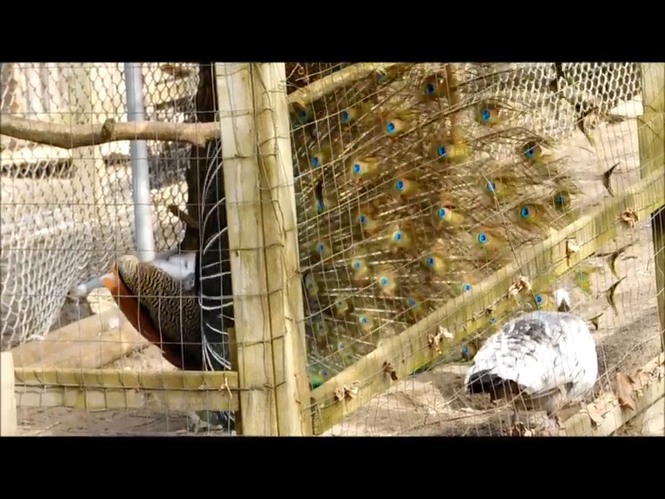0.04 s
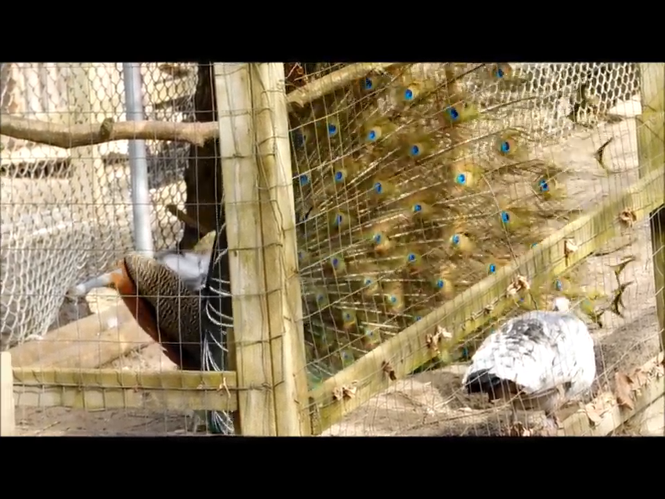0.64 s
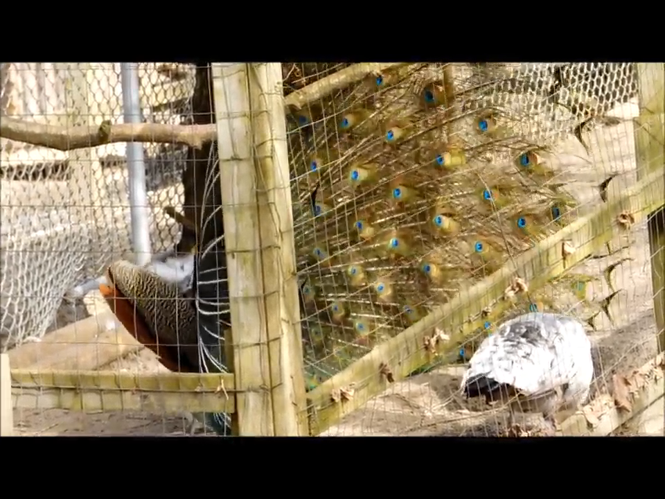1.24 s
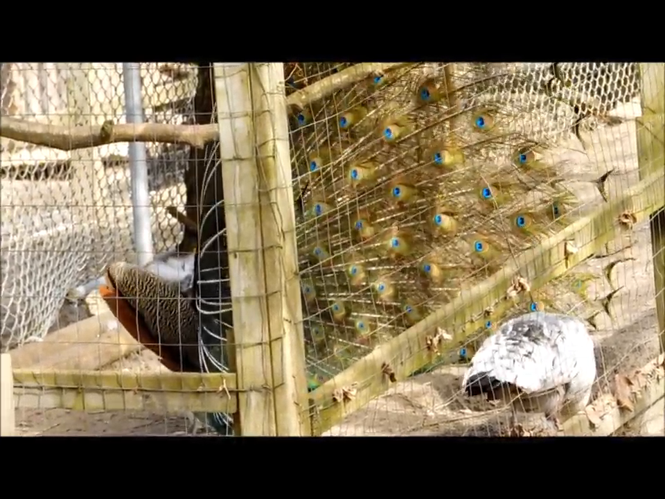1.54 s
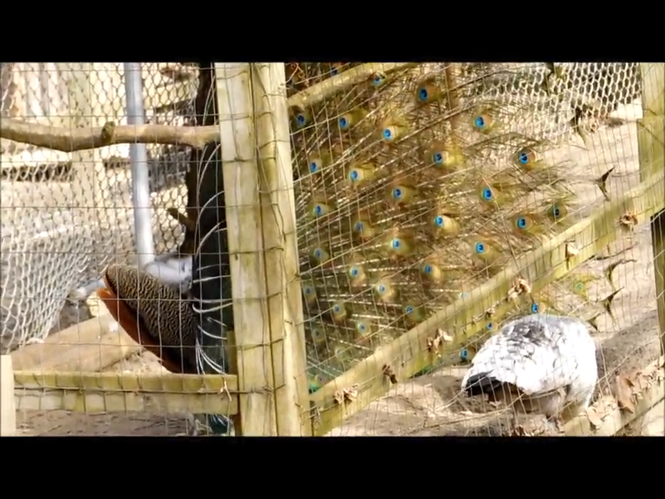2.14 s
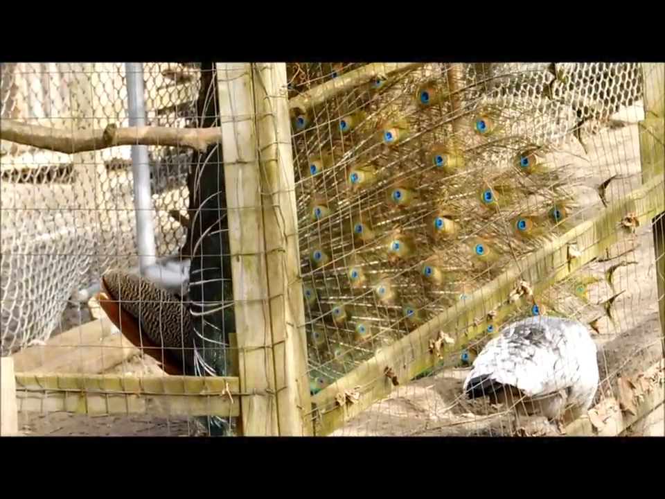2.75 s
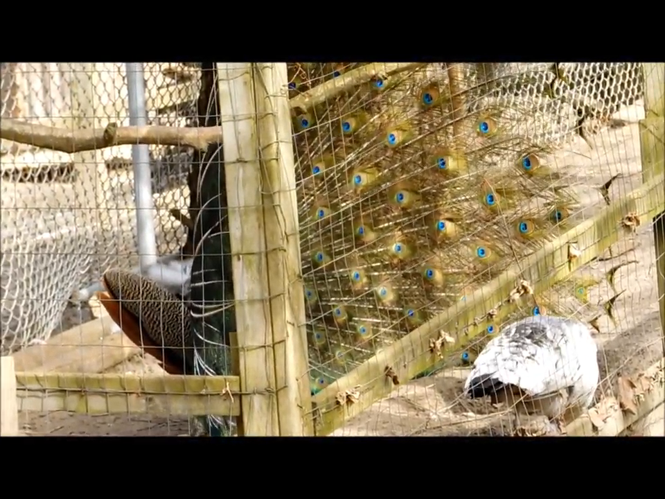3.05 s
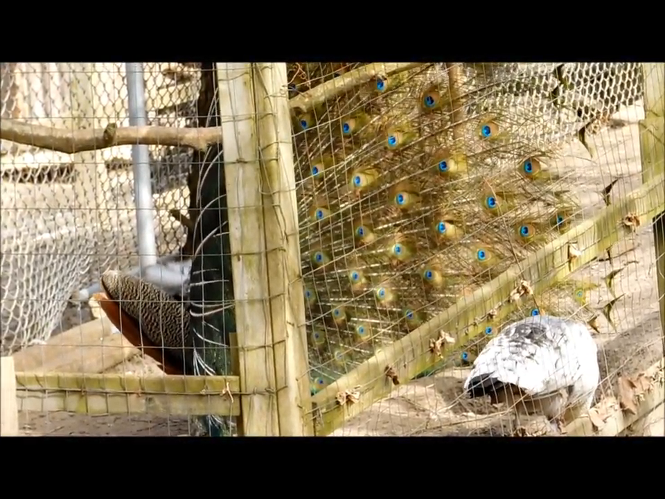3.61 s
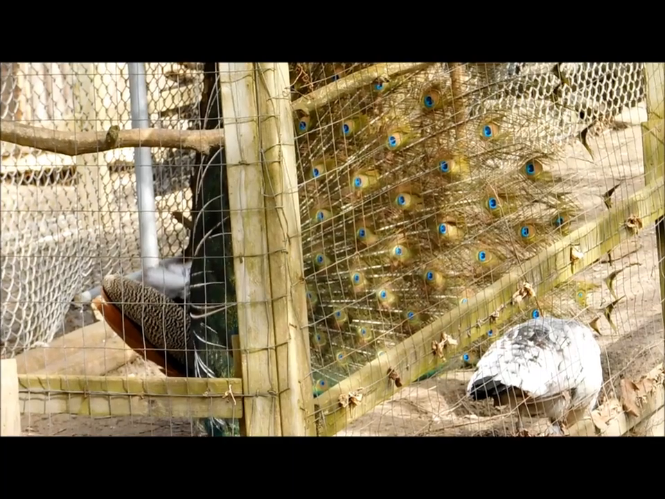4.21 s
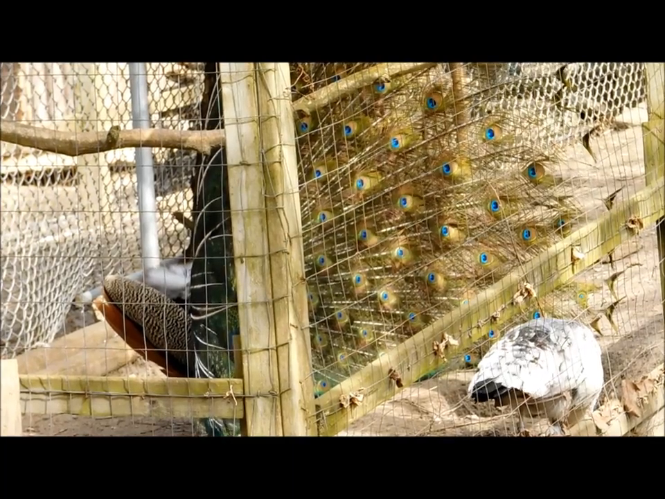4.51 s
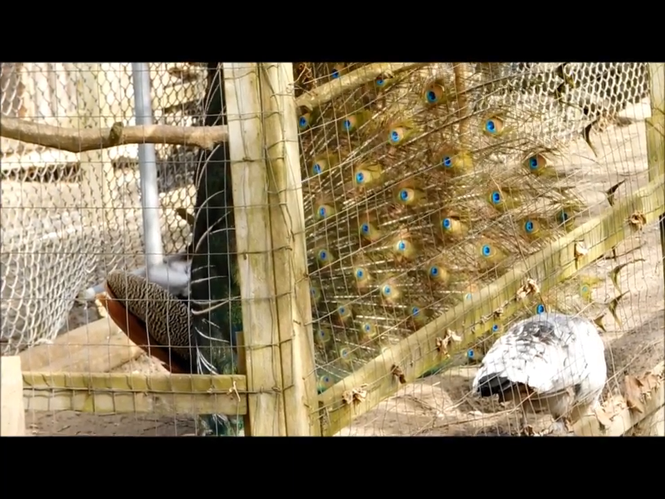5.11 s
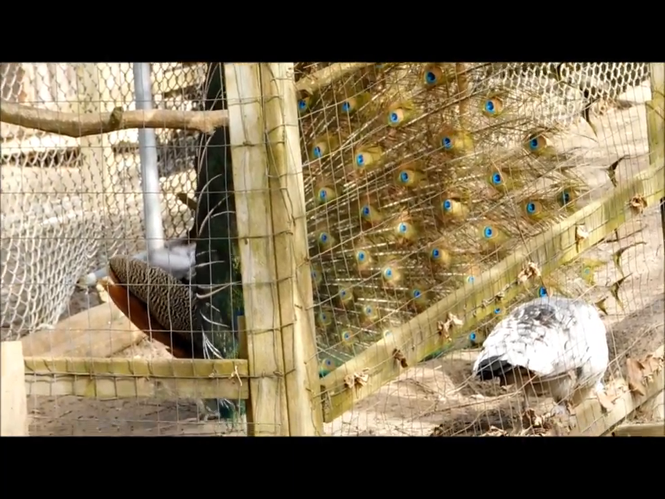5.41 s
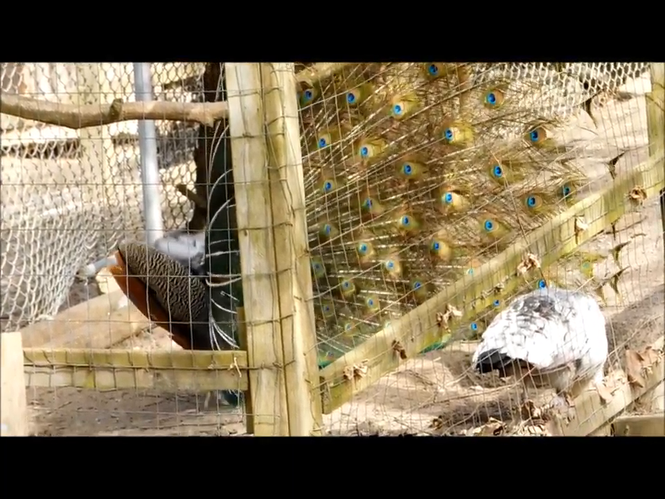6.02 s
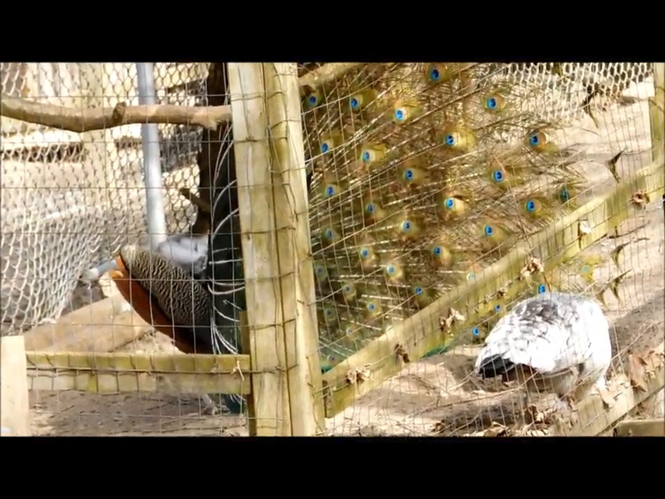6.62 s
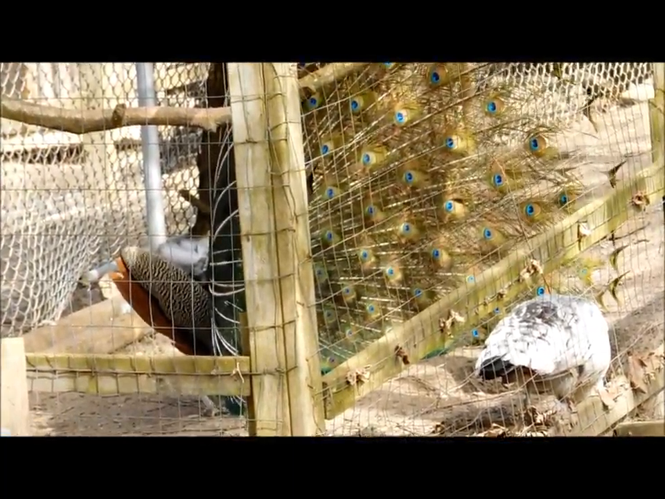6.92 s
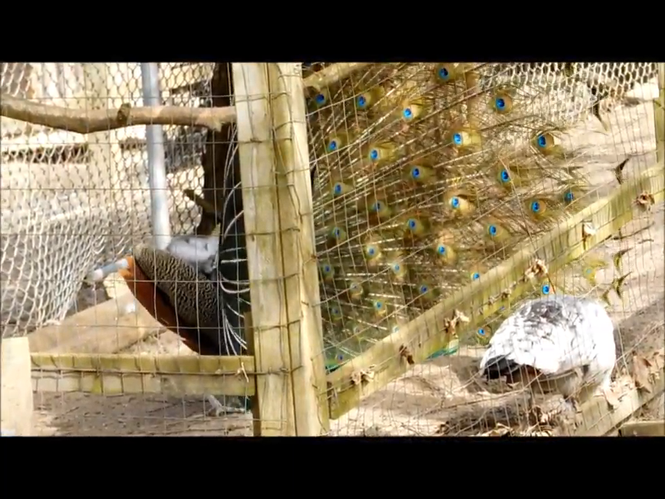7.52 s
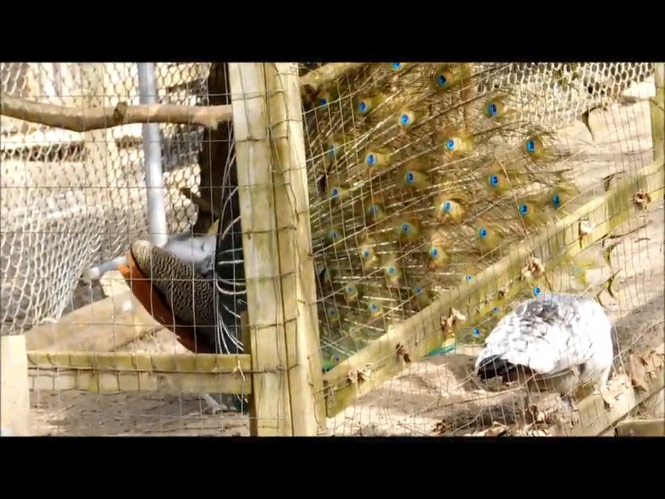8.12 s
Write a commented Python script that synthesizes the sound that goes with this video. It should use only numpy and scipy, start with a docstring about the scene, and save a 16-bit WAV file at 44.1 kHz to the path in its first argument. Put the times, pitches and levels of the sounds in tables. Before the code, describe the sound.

Outdoors by a bird pen, a diesel engine idles some way off with a low drone, clatter and a regular metal clank. After about two seconds it is switched off and shudders to rest with rattling panels. In the quiet a sparrow chips, and a songbird to the left repeats a short rising whistle. Something hard snaps once close to the microphone. Faint distant traffic and hiss lie underneath.

```python
"""A three-cylinder diesel idles some way off, is switched off and shudders to rest by a peacock pen.
Exhaust puffs drone, block and injectors clatter, a loose part clanks; last compressions jolt the panels.
In the quiet a songbird repeats a rising whistle, a sparrow chips, and something hard snaps close by.
Distant traffic and a faint hiss lie under it all."""
import sys
import numpy as np
from scipy import signal
from scipy.fft import rfft, irfft, next_fast_len
from scipy.io import wavfile

SR = 44100
rng = np.random.default_rng(int(sys.argv[2]) if len(sys.argv) > 2 else 0)


def wav_out(sig):
    """Save sig, one row per channel (or a flat mono array), as 16-bit PCM at SR to the path in sys.argv[1]."""
    wavfile.write(sys.argv[1], SR, np.round(np.clip(np.atleast_2d(sig).T, -1, 1) * 32767).astype(np.int16))


N = 368235
T = np.arange(N) / SR
FUEL_CUT_S = 2.08
ENGINE_LEAD_S = 0.00011   # left ear first

# interaural correlation, ambient and engine: (frequency [Hz], correlation [-1..1])
AIR_LIKENESS = [(100, 0.37), (250, -0.15), (400, -0.099), (600, 0.18), (1200, -0.11), (2000, -0.084),
                (3000, -0.078), (4200, 0.00018), (5500, 0.16), (15000, 0.53)]
ENGINE_LIKENESS = [(100, 0.99), (400, 0.92), (1000, 0.86), (3000, 0.36), (5000, 0.098), (15000, 1)]
# metal contacts per working cycle: (place [cycles], knock [dB], tick [dB])
CONTACTS = [(.07, -2.5, 9), (.219, -2, -12), (.33, -10.5, 8), (.395, 0, -12), (.66, -5, 5), (.709, -6, 4),
            (0.787, -4.5, -10), (.915, -7.5, 6), (.955, -4, -12)]


def from_db(db):
    """Decibels to gain."""
    return 10 ** (np.asarray(db) / 20)


def rms_one(x):
    """Scale to rms 1."""
    return x / np.sqrt(np.mean(x ** 2) + 1e-20)


def bell(x, centre, width):
    """Gaussian of height 1."""
    return np.exp(-((x - centre) / width) ** 2)


def add(track, s, sound):
    """Mix a short sound in at time s."""
    i = int(s * SR)
    track[i:i + len(sound)] += sound[:N - i]


def at_hz(points, hz):
    """Interpolate on a log-frequency axis."""
    f, value = np.transpose(points)
    return np.interp(np.log(hz), np.log(f), value)


def filtered(x, response):
    """Apply response(hz) by FFT."""
    size = next_fast_len(N + 4096, real=True)
    hz = np.maximum(np.arange(size // 2 + 1) * SR / size, 1)
    return irfft(rfft(x, size) * response(hz), size)[..., :N]


def coloured(x, colour):
    """Apply a spectrum; roll off below 18 Hz."""
    return filtered(x, lambda hz: from_db(at_hz(colour, hz)) / (1 + (18 / hz) ** 4))


def drift(rate_hz):
    """Low-passed noise, rms 1."""
    return rms_one(filtered(rng.standard_normal(N), lambda hz: 1 / (1 + (hz / rate_hz) ** 4)))


def placed(left, right, lead_s, pan_db):
    """Delay the right ear; positive pan is left."""
    right = filtered(right, lambda hz: np.exp(-2j * np.pi * hz * lead_s))
    return np.array([left * from_db(pan_db / 2), right * from_db(-pan_db / 2)])


def ears(mid, side, likeness, lead_s=0, pan_db=0):
    """Stereo of given correlation from two independent signals."""
    alike = lambda hz: np.clip(at_hz(likeness, hz), -1, 1)
    mid = filtered(mid, lambda hz: np.sqrt((1 + alike(hz)) / 2))
    side = filtered(side, lambda hz: np.sqrt((1 - alike(hz)) / 2))
    return placed(mid + side, mid - side, lead_s, pan_db)


def stereo_noise(colour, likeness, lead_s=0, pan_db=0):
    """Coloured stereo noise, rms 1."""
    return rms_one(ears(*coloured(rng.standard_normal((2, N)), colour), likeness, lead_s, pan_db))


def scatter(t60_s):
    """Decaying reflections, unit energy."""
    t = T[:SR // 2]
    spray = rng.standard_normal(len(t)) * from_db(-60 * t / t60_s)
    return spray / np.sqrt(np.sum(spray ** 2))


def through(x, response):
    """Convolve with an impulse response."""
    return signal.fftconvolve(x, response)[:N]


def background(traffic_db=-53, hiss_db=-58, split_hz=4500):
    """Far traffic below the split, grainy hiss above; each dips once."""
    # ambient spectrum: (frequency [Hz], density [dB])
    air_colour = [(13, -31), (22, 0), (70, -2.5), (108, -4.5), (142, -5), (177, -9), (290, -8), (475, -8.5),
                  (516, -7.5), (1390, -9), (1820, -10), (2400, -11), (4040, -14), (4630, -14.5),
                  (15500, -11.5)]
    air = stereo_noise(air_colour, AIR_LIKENESS)
    low = filtered(air, lambda hz: 1 / (1 + (hz / split_hz) ** 4))
    band_rms = lambda lo, hi: np.std(filtered(air.mean(0), lambda hz: (hz > lo) & (hz < hi)))
    traffic, hiss = low / band_rms(200, 1500), (air - low) / band_rms(7000, 15000)
    sway_db = .4 * drift(3.4) - 1.3 * bell(T, 4.02, .13)
    flicker_db = 1.6 * drift(90) + .6 * drift(12) - 3.5 * bell(T, 2.27, .16)
    return traffic * from_db(traffic_db + sway_db) + hiss * from_db(hiss_db + flicker_db)


def bumps():
    """Soft bass bumps, nearly alike in both ears."""
    # swells: (time [s], half width [s], level [dB])
    swells = [(7.57, 0.022, -53), (7.64, 0.025, -48), (7.855, 0.026, -45.5), (8.26, 0.085, -56)]
    # spectrum: (frequency [Hz], level [dB])
    colour = [(30, -6), (70, 1), (150, -16), (300, -15), (1500, -13), (5000, -31)]
    envelope = sum(from_db(db) * bell(T, s, width_s) for s, width_s, db in swells)
    return envelope * stereo_noise(colour, ENGINE_LIKENESS)


def rustle(at_s=4.2, width_s=0.053, level_db=-56):
    """Faint, brief rustle in the pen."""
    # spectrum: (frequency [Hz], level [dB])
    colour = [(2000, -28), (3500, -7), (4500, -2), (6500, -8)]
    return from_db(level_db) * bell(T, at_s, width_s) * stereo_noise(colour, AIR_LIKENESS)


def swoop(at_s=1.215, tone_hz=242, sag_hz_per_s=750, thud_s=1.32, thud_hz=72):
    """A faint low tone slides down, then a soft thud."""
    age = T - at_s
    tone = bell(T, at_s, .044) * np.sin(2 * np.pi * (tone_hz - sag_hz_per_s * age / 2) * age)
    thud = bell(T, thud_s, .011) * np.sin(2 * np.pi * thud_hz * (T - thud_s))
    return from_db(-43) * tone + from_db(-39) * thud


def chips(top_share=.33):
    """Sparrow: short, raspy pitch arches."""
    # chips: (time [s], length [s], start [Hz], top [Hz], end [Hz], level [dB], rasp [share of pitch])
    calls = [(3.08, 0.059, 3520, 3650, 3400, -52, .04), (3.281, .03, 3400, 3590, 3450, -52, .02),
             (3.33, 0.051, 2780, 3340, 3300, -47, 0.03), (3.353, 0.036, 3160, 3020, 2720, -38.5, 0.017),
             (3.731, 0.033, 3550, 3630, 3250, -48, .03), (3.773, .07, 3330, 3680, 3400, -47, .09),
             (3.823, 0.044, 2640, 2770, 2680, -47, .045)]
    out, wobble = np.zeros(N), drift(303)
    for s, length_s, start_hz, top_hz, end_hz, db, rasp in calls:
        span = (T > s) & (T < s + length_s)
        progress = (T[span] - s) / length_s
        arch = np.sqrt(np.abs(np.sin(np.pi * progress)))
        hz = np.interp(progress, [0, top_share, 1], [start_hz, top_hz, end_hz])
        hz *= 1 + rasp * wobble[span]
        out[span] += from_db(db) * arch * np.sin(2 * np.pi * np.cumsum(hz) / SR)
    return out


def whistles(level_db=-3, overtone_db=-25, attack_s=.0023, release_s=.0017, waver=.009, fray=.022):
    """Songbird: a repeated upward slur that swells midway, frays and ends in a steep flick."""
    # whistles: (time [s], length [s], level [dB], start-to-end gain [dB], flick accent [dB])
    calls = [(3.659, .17, -43.5, 9, -3), (4.098, 0.17, -46, 7, 1), (4.476, 0.17, -39.5, -2, 1),
             (4.857, 0.18, -42.5, 0, -2), (5.201, 0.16, -39, -2, 1), (5.52, 0.16, -39, -5, 6),
             (5.827, 0.17, -37.5, 2, 2), (6.142, 0.15, -37, 3, 2), (6.443, 0.17, -40, 1, 1),
             (6.75, .164, -38.7, 3, -3), (7.05, .16, -39.3, 1, 0), (7.354, 0.17, -39.5, 1, -1),
             (7.665, .16, -38.5, 1, 1), (7.973, 0.18, -40, 1, -6)]
    # common contour: (progress [0..1], pitch [Hz], level [dB])
    slur = [(0, 1860, -8), (.12, 2000, -2.5), (.24, 2150, -2), (.4, 2350, 1.5), (.54, 2510, 1.5),
            (.64, 2660, -3), (.75, 2850, -2), (.87, 3170, -2.5), (.9, 3450, -8), (.94, 3780, -6),
            (1, 3900, -9)]
    share, slur_hz, slur_db = np.transpose(slur)
    out, wobble, flutter_db = np.zeros(N), drift(340), 2.8 * drift(80)
    for s, length_s, db, swell_db, flick_db in calls:
        span = (T > s) & (T < s + length_s)
        age = T[span] - s
        progress = age / length_s
        gate = np.clip(np.minimum(age / attack_s, (length_s - age) / release_s), 0, 1)
        hz = np.interp(progress, share, slur_hz) * (1 + (waver + fray * progress ** 2) * wobble[span])
        phase = 2 * np.pi * np.cumsum(hz) / SR
        tone = np.sin(phase) + from_db(overtone_db) * np.sin(2 * phase)
        effort_db = np.interp(progress, share, slur_db) + swell_db * (progress - .5)
        effort_db += flick_db * bell(progress, .96, .08) + flutter_db[span]
        out[span] += gate * from_db(level_db + db + effort_db) * tone
    return out


def birds(ground_s=.003, ground_db=-10, tail_db=-6.5, tail_t60_s=0.36):
    """Both birds from the left, with a ground echo and a tail off far sheds."""
    song = whistles() + chips()
    heard = song + from_db(ground_db) * np.interp(T - ground_s, T, song)
    yard = np.array([through(song, from_db(tail_db) * scatter(tail_t60_s)) for _ in range(2)])
    return placed(heard, heard, lead_s=.00019, pan_db=4.5) + yard


def snap(right_db=3.5, crack_db=-12, crack_t60_s=.012, wet_db=-13, yard_t60_s=.086, low_cut_hz=550):
    """Dry snap near the right ear: a click rings the short modes of a small, light object."""
    # tick, snap, echo: (time [s], level [dB], right-ear lead [s])
    hits = [(5.2496, -25, 0.00015), (5.2762, -9.5, 0.00014), (5.284, -23, 0.00016)]
    # object modes: (frequency [Hz], level [dB], t60 [s])
    modes = [(785, -25, 0.013), (1050, -19, 0.024), (1410, -13, 0.014), (1910, -10.5, 0.024),
             (2410, -3, 0.012), (3040, -4, 0.0077), (3600, -12, 0.0099), (4400, -10.5, 0.0077),
             (5420, -13.5, .005), (6500, -12.5, 0.0041), (7800, -12, 0.0041), (10900, -7, 0.0034),
             (15000, -21, .003)]
    out, t = np.zeros((2, N)), T[:SR // 20]
    for ear in range(2):
        ring = sum((-1) ** k * from_db(db + rng.normal(0, 1) - 60 * t / t60_s)
                   * np.sin(2 * np.pi * hz * t) for k, (hz, db, t60_s) in enumerate(modes))
        ring += from_db(crack_db - 60 * t / crack_t60_s) * rng.standard_normal(len(t))
        for s, db, lead_s in hits:
            add(out[ear], s + lead_s * (1 - ear), from_db(db + right_db * ear) * ring)
        out[ear] += from_db(wet_db) * through(out[ear], scatter(yard_t60_s))
    return signal.sosfilt(signal.butter(2, low_cut_hz, "high", fs=SR, output="sos"), out + 1e-18)


def hard_knocks(t60_s=0.0094):
    """A few dry, hollow knocks from the machine stand out above its clatter."""
    # knocks: (time [s], peak [dB], pitch [Hz])
    knocks = [(1.2045, -23.5, 950), (1.3165, -26, 1300)]
    out, t = np.zeros(N), T[:SR // 20]
    for s, db, hz in knocks:
        add(out, s, -from_db(db - 60 * t / t60_s) * np.sin(2 * np.pi * hz * t))
    return placed(out, out, ENGINE_LEAD_S, pan_db=1.5)


def jolts(rise_s=.0083, t60_s=.27, panel_rise_s=.01, panel_t60_s=.14, thump_hz=65, thump_t60_s=.064):
    """The last compressions rock the machine on its mounts; each rings one panel most."""
    # jolts: (time [s], rattle [dB], thump [dB], panel [Hz], panel [dB])
    shudders = [(2.268, -44.5, -38, 138, -35), (2.336, -60, -48, 170, -41.5), (2.389, -45, -33, 284, -46),
                (2.463, -42.5, -53, 1106, -45), (2.502, -48, -34, 327, -39), (2.525, -55, -58, 890, -45),
                (2.605, -44, -54, 1024, -40), (2.66, -45, -42, 754, -48), (2.756, -49, -49, 330, -44),
                (2.814, -44.5, -49, 1010, -56), (2.936, -39.5, -55, 1026, -38),
                (3.092, -46.5, -61, 727, -41)]
    # rattle spectrum: (frequency [Hz], level [dB])
    colour = [(100, -6), (240, -1.5), (325, 1), (410, -4), (560, -1), (650, -2), (750, 4.5), (840, 2),
              (1020, 0.5), (1400, -1), (2500, -26), (8000, -39)]
    rattle, thump, ring = np.zeros((3, N))
    for s, rattle_db, thump_db, panel_hz, panel_db in shudders:
        age = np.maximum(T - s, 0)
        rattle += from_db(rattle_db - 60 * age / t60_s) * np.minimum(age / rise_s, 1)
        panel_gain = from_db(panel_db - 60 * age / panel_t60_s) * np.minimum(age / panel_rise_s, 1)
        ring += panel_gain * np.sin(2 * np.pi * panel_hz * age)
        thump -= from_db(thump_db - 60 * age / thump_t60_s) * np.sin(2 * np.pi * thump_hz * age)
    return rattle * stereo_noise(colour, ENGINE_LIKENESS, ENGINE_LEAD_S) + thump + ring


def clanks(cycles, place=.64, level_db=-29.5, crack_t60_s=.011, wet_db=-5, yard_t60_s=.23):
    """A loose part strikes and bounces once per cycle until the fuel is cut."""
    # hardest clanks: (time [s], boost [dB])
    accents = [(.046, 5), (.108, 3), (.17, 4), (.232, 3), (.354, 5), (.481, 5), (.543, 7), (.605, 7.5),
               (.792, 5), (.916, 4), (1.04, 2.5), (1.226, 5), (1.288, 5.5), (1.35, 7), (1.474, 3),
               (1.537, 5), (1.723, 7), (1.785, 8.5), (1.971, 6), (2.033, 7)]
    # triple bounce: (delay [s], level [dB])
    bounces = [(0, -9), (.0035, -1.5), (.0078, -.5)]
    # modes of the part: (frequency [Hz], level [dB], t60 [s])
    modes = [(1480, -3.5, 0.007), (1860, 6, 0.017), (1950, 5.5, 0.01), (2110, -5, 0.036),
             (2260, -8.5, 0.021), (3060, 0.5, 0.0045), (3260, -22, 0.0037)]
    out, t = np.zeros(N), T[:SR // 20]
    crack_band = signal.butter(2, [1300, 3300], "band", fs=SR)
    strike_cycles = np.arange(place, np.interp(FUEL_CUT_S, T, cycles))
    for s in np.interp(strike_cycles, cycles, T):
        accent_db = sum(db for at_s, db in accents if abs(at_s - s) < .03)
        blow_db = level_db + accent_db + rng.normal(0, .6)
        for delay_s, bounce_db in bounces:
            ring = sum(from_db(db + rng.normal(0, .5) - 60 * t / t60_s) * np.sin(2 * np.pi * hz * t)
                       * rng.choice([-1, 1]) for hz, db, t60_s in modes)
            crack = 2 * signal.lfilter(*crack_band, rng.standard_normal(len(t)))
            ring += from_db(5 - 60 * t / crack_t60_s) * crack
            add(out, s + delay_s, from_db(blow_db + bounce_db) * ring / np.abs(ring).max())
    yard = np.array([through(out, from_db(wet_db) * scatter(yard_t60_s)) for _ in range(2)])
    return placed(out, out, ENGINE_LEAD_S, pan_db=3) + yard


def clatter(cycles, levels_db, colour, ring_t60_s, loose, uneven_db):
    """Contacts ring the same metal each cycle; `loose` adds fresh noise per blow. Rms 1 at idle."""
    blows = np.zeros(N)
    for (place, *_), db in zip(CONTACTS, levels_db):
        at = np.searchsorted(cycles, np.arange(48) + place)
        size = from_db(db + uneven_db * rng.standard_normal(len(at)))
        blows[at[at < N]] += size[at < N]
    ring, yard = (from_db(-60 * T[:SR // 4] / t60_s) for t60_s in (ring_t60_s, .15))
    power = through(blows ** 2, ring ** 2 / np.sum(ring ** 2) + yard ** 2 / np.sum(yard ** 2))
    noise_gain = loose * np.sqrt(np.abs(power))
    paths = [through(blows, scatter(ring_t60_s) + scatter(.25)) + noise_gain * rng.standard_normal(N)
             for _ in range(2)]
    sound = ears(*coloured(np.array(paths), colour), ENGINE_LIKENESS, ENGINE_LEAD_S, pan_db=2)
    return sound / np.std(sound[:, :2 * SR])


def exhaust(speed, cycles, unfired, idle_db=-37.5, puff_place=.3):
    """Exhaust puffs drone and panels buzz along; without fuel the puffs turn weak and ragged."""
    # harmonics of puffs and panels: (order [per cycle], level [dB])
    puff_orders = [(3, -1.5), (6, 1.5), (9, 3.5), (12, -9.5), (15, -15), (18, -14.5), (19, -15), (21, -9),
                   (22, -14.5), (23, -20), (25, -19), (27, -31)]
    panel_orders = [(47, -20.5), (48, -7.5), (59, -8.5), (61, -8.5), (64, -13), (66, -16.5), (75, -9.5)]
    lag = lambda k: np.pi / 2 / (1 + (k / 3) ** 4)   # the deepest note leaves the muffler late
    drone = sum(-from_db(db) * np.cos(2 * np.pi * k * (cycles - puff_place) - lag(k))
                for k, db in puff_orders)
    drone += sum(from_db(db) * (1 + .14 * drift(8.6)) * np.sin(2 * np.pi * (k * cycles + rng.random()))
                 for k, db in panel_orders)
    drone /= np.std(drone[:2 * SR])
    drone *= from_db(idle_db - 9 * unfired - 14.5 * (1 - speed))
    drone *= 1 + .7 * unfired * drift(35)
    return placed(drone, drone, ENGINE_LEAD_S, pan_db=1)


def block(speed, cycles, unfired, knock_db=-36.5, tick_db=-45):
    """The block knocks and the injectors tick, softer without fuel and as speed falls."""
    # spectra: (frequency [Hz], level [dB])
    knock_colour = [(35, -16), (70, -16), (150, -3.5), (260, -1), (350, 1.5), (480, -4), (750, 1.5),
                    (880, 1), (1030, 3.5), (1250, 0.5), (1500, 0.5), (2200, -5.5), (3200, -10.5),
                    (5500, -25), (12000, -28)]
    tick_colour = [(500, 6), (1300, -7), (1900, 7.5), (2400, -7), (3000, 8), (3900, -17), (5000, -3),
                   (12000, -30)]
    _, knocks_db, ticks_db = np.transpose(CONTACTS)
    knock = clatter(cycles, knocks_db, knock_colour, ring_t60_s=.031, loose=.88, uneven_db=1.25)
    tick = clatter(cycles, ticks_db, tick_colour, ring_t60_s=.032, loose=2.1, uneven_db=4)
    drop_db = 8.5 * unfired + 2.5 * (1 - speed)
    return knock * from_db(knock_db - drop_db) + tick * from_db(tick_db - drop_db - 3 * unfired)


def fan(speed, unfired, idle_db=-44):
    """Even rush of fan and gears, fading with speed."""
    # spectrum: (frequency [Hz], density [dB])
    colour = [(500, -21), (1400, -3.5), (1800, -1.5), (2300, 1.5), (2650, -4.5), (3100, -8), (4000, -10),
              (5200, -12.5), (7000, -15.5), (12000, -27)]
    rush = stereo_noise(colour, ENGINE_LIKENESS, ENGINE_LEAD_S, pan_db=2)
    return rush * speed * from_db(idle_db - 8 * unfired + 1.2 * drift(4))


def crankshaft(coast_s=1.15, coast_bend=1.3):
    """Speed [share of idle] and cycles done, three firings each; coasting slows fastest at first."""
    # idle speed: (time [s], firing rate [Hz])
    idle = [(0, 48.2), (1.0, 48.4), (2.03, 47.9)]
    idle_hz = np.interp(T, *np.transpose(idle))
    speed = np.clip(1 - (T - FUEL_CUT_S) / coast_s, 0, 1) ** coast_bend
    cycle_hz = idle_hz * speed / 3 * (1 + .0015 * drift(5))
    return speed, np.cumsum(cycle_hz) / SR


def engine(speed, cycles, burn_out_s=.14, stall_share=.21):
    """Exhaust, block and fan drop as the last fuel burns, then fade out near stall."""
    unfired = np.clip(.5 + (T - FUEL_CUT_S) / burn_out_s, 0, 1)
    turning = np.minimum(speed / stall_share, 1)
    sound = exhaust(speed, cycles, unfired) + block(speed, cycles, unfired) + fan(speed, unfired)
    return turning * sound


def scene():
    """All sources, stereo."""
    speed, cycles = crankshaft()
    diesel = engine(speed, cycles) + clanks(cycles) + hard_knocks() + jolts()
    return diesel + background() + bumps() + swoop() + rustle() + birds() + snap()


def record(dry):
    """Steep low-pass at 15850 Hz."""
    return signal.sosfilt(signal.ellip(10, .1, 80, 15850, fs=SR, output="sos"), dry)


dry = scene()
out = record(dry)
wav_out(out)
```